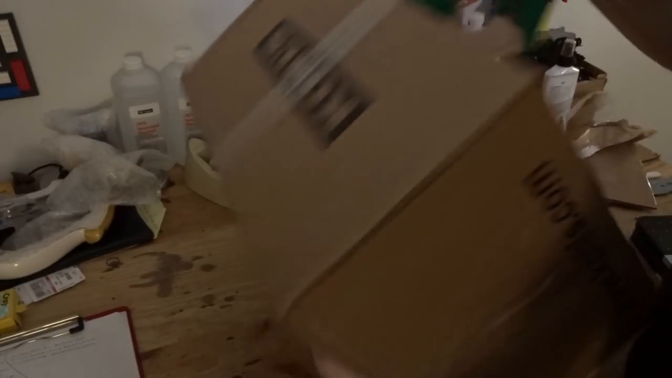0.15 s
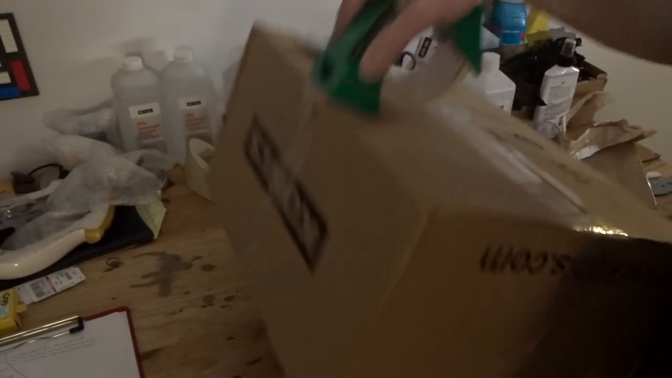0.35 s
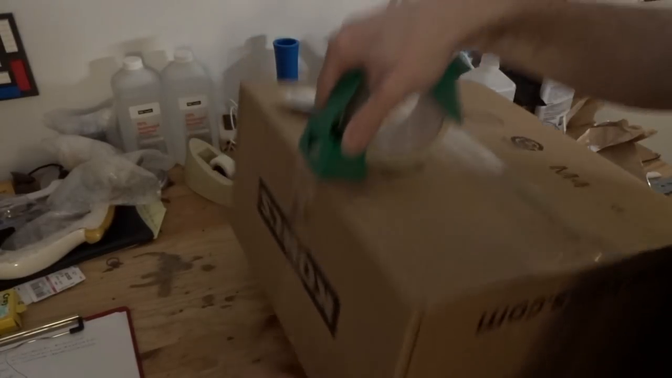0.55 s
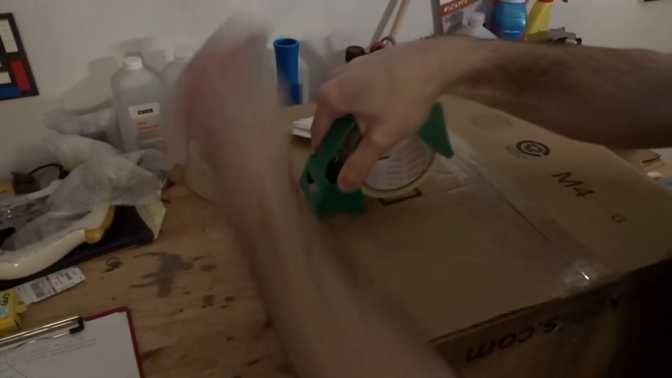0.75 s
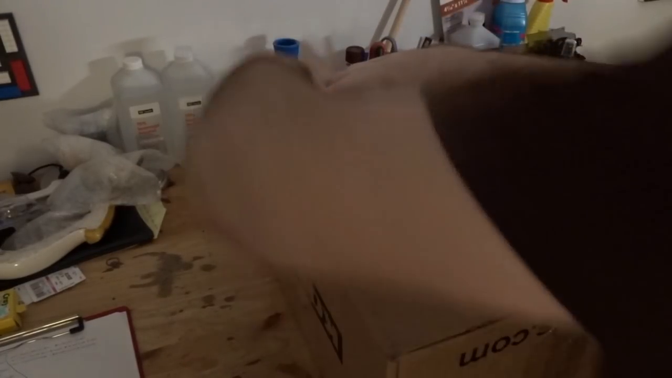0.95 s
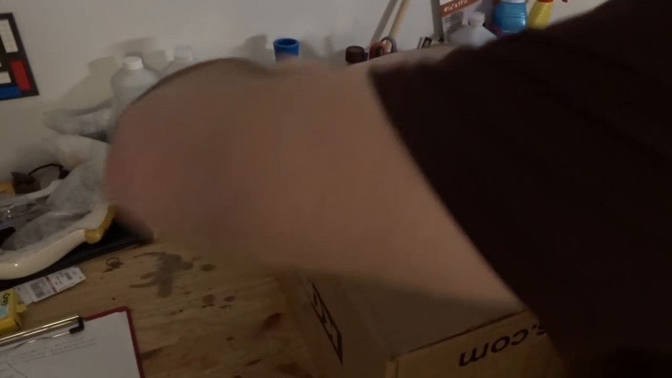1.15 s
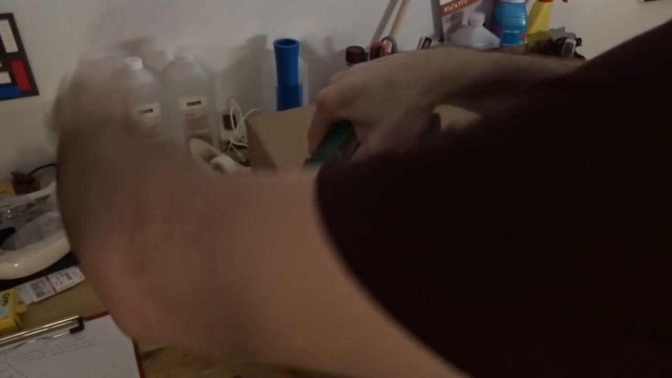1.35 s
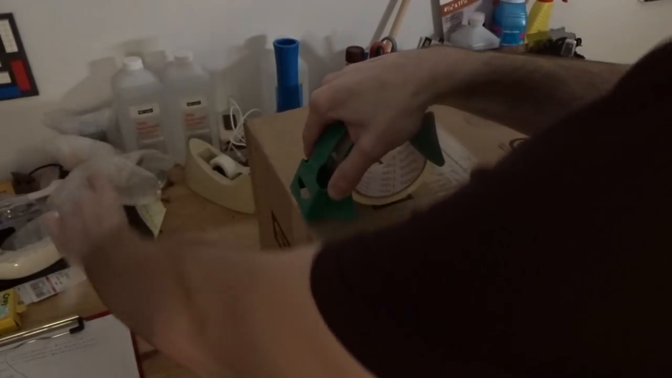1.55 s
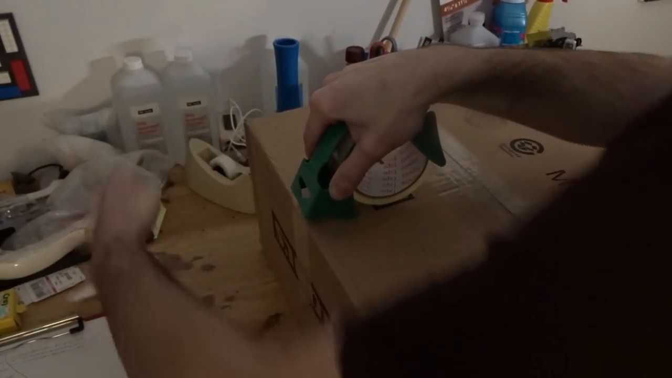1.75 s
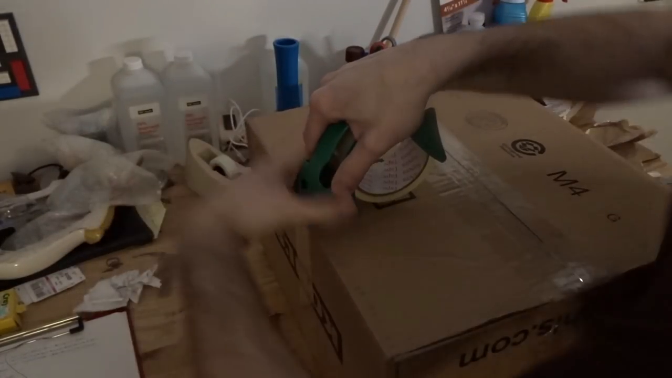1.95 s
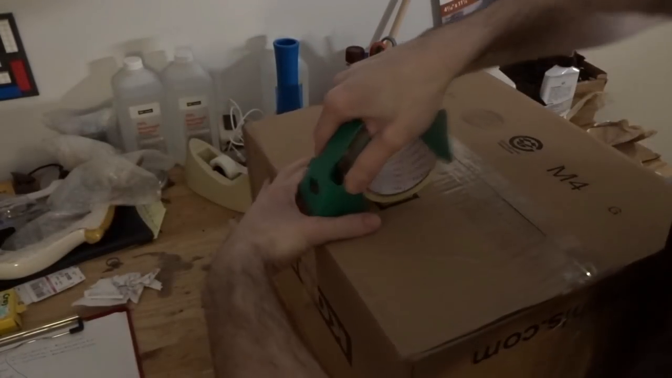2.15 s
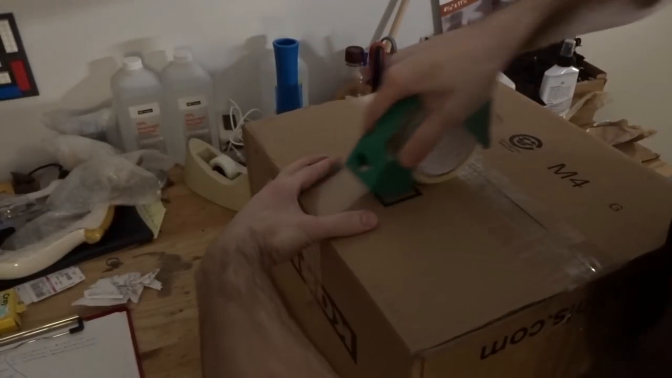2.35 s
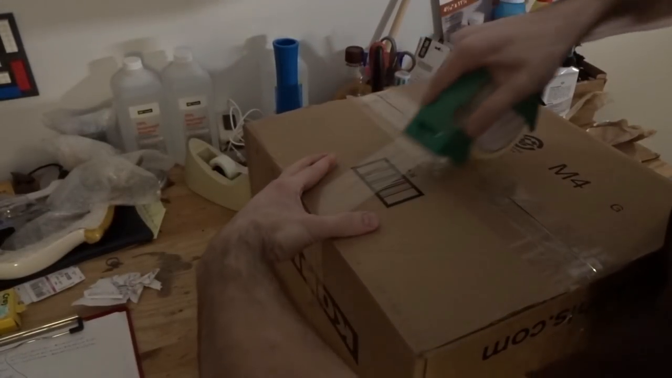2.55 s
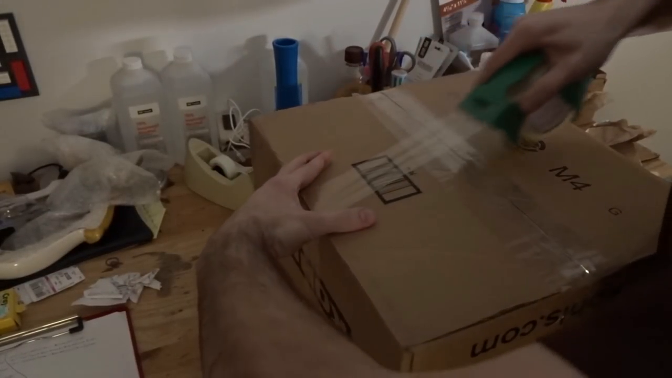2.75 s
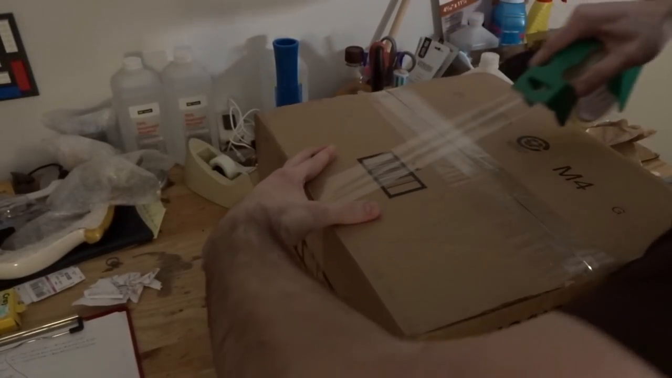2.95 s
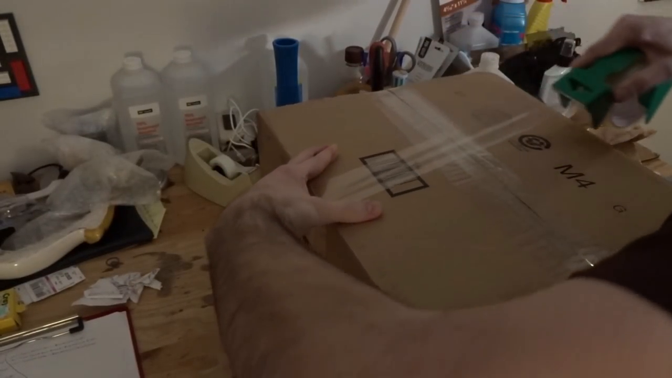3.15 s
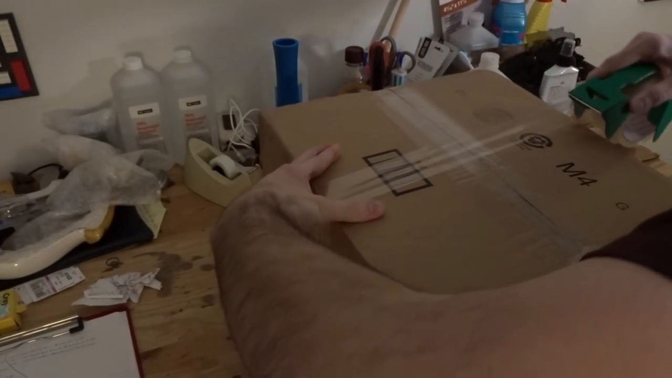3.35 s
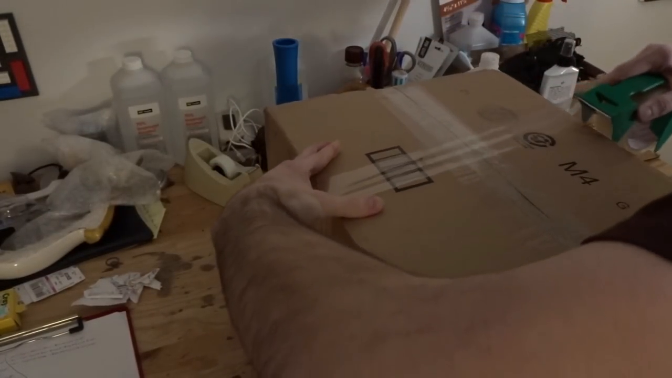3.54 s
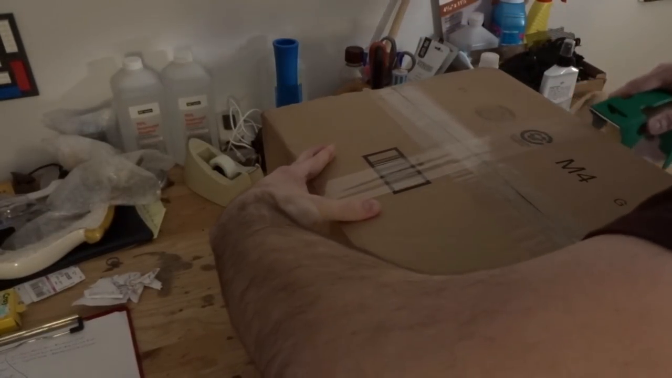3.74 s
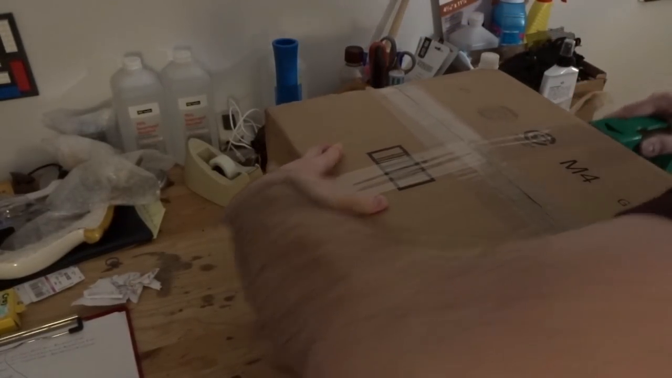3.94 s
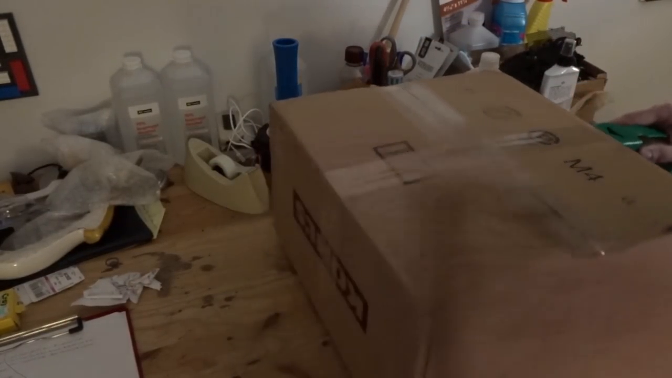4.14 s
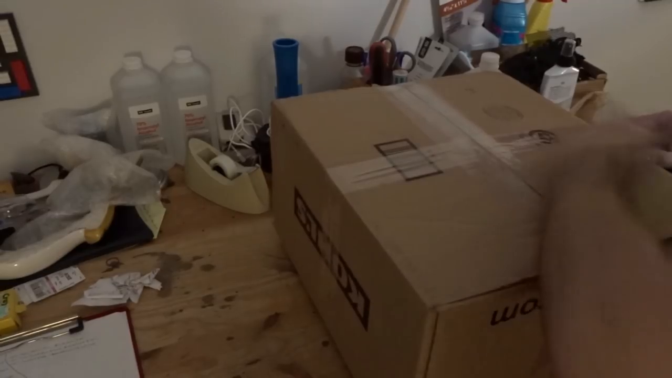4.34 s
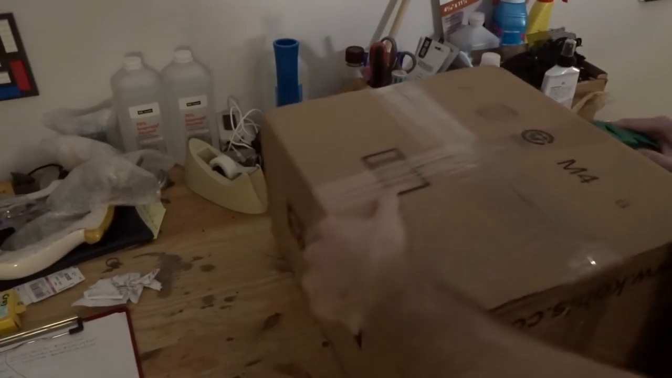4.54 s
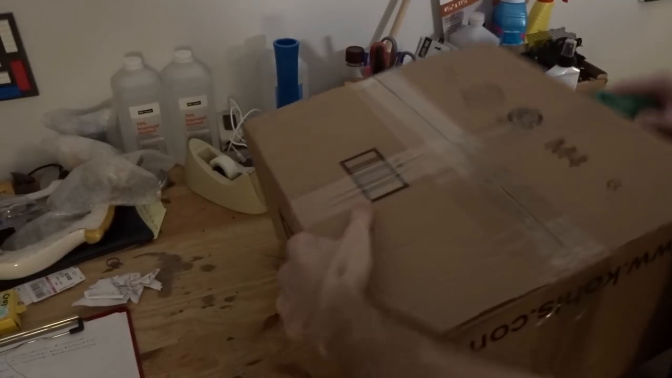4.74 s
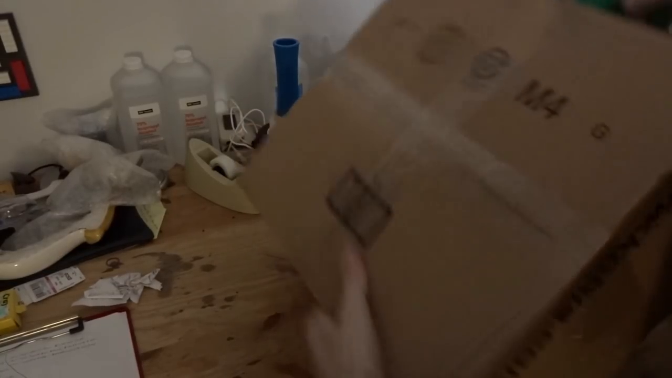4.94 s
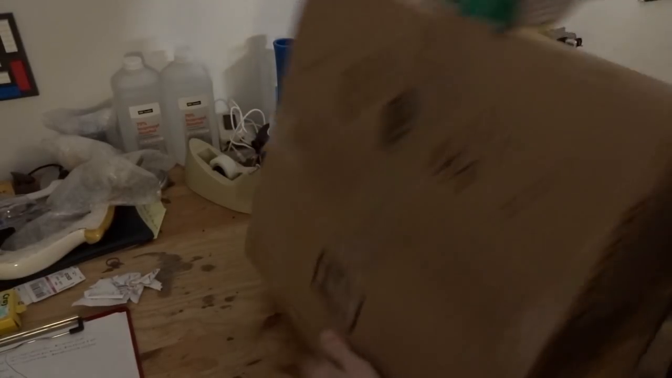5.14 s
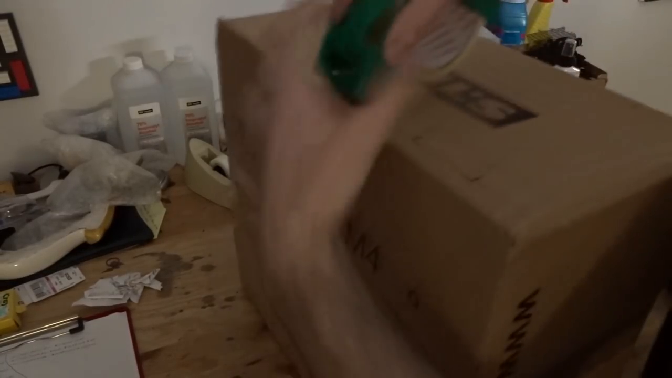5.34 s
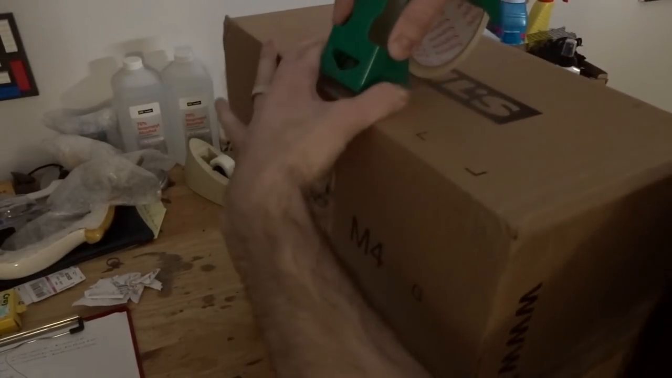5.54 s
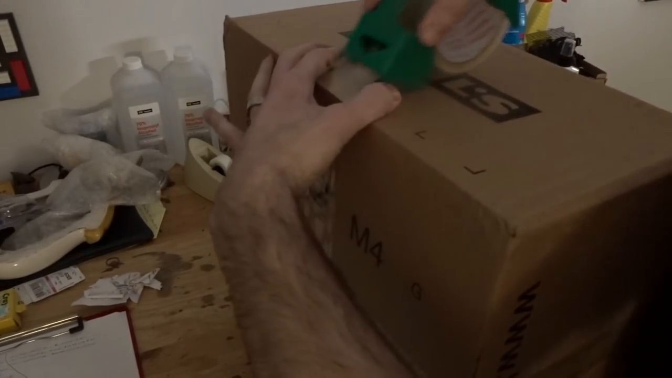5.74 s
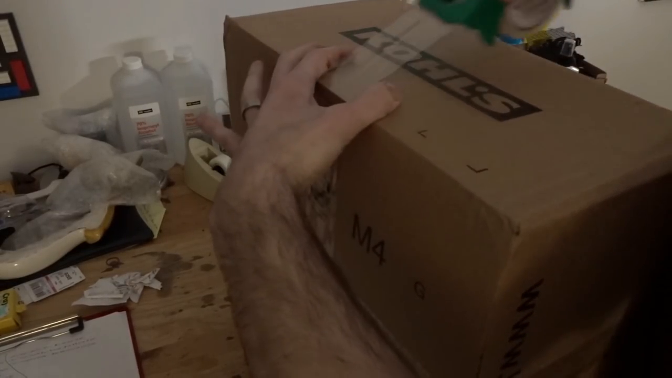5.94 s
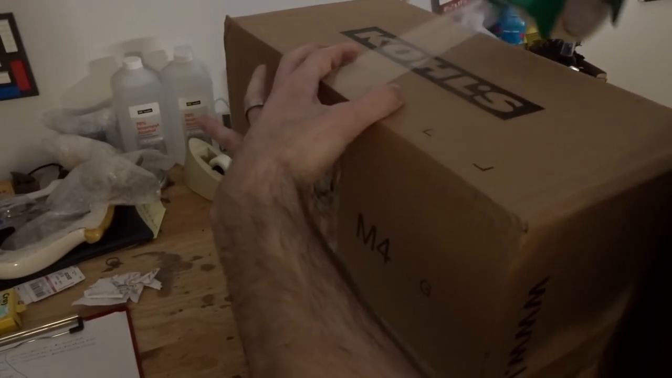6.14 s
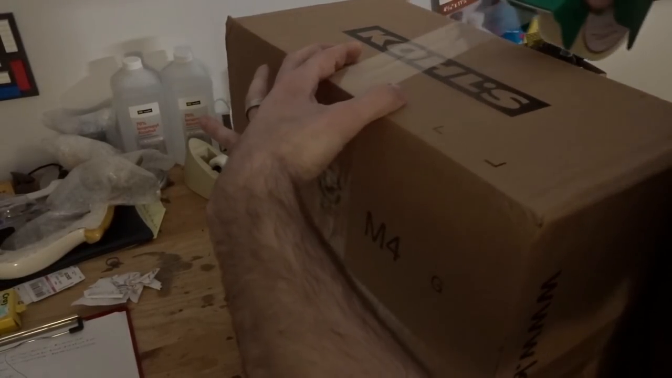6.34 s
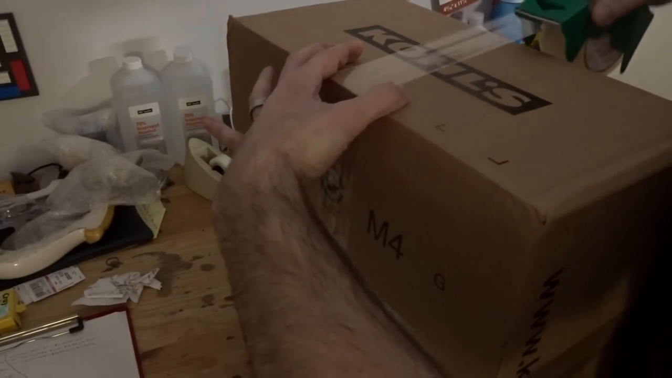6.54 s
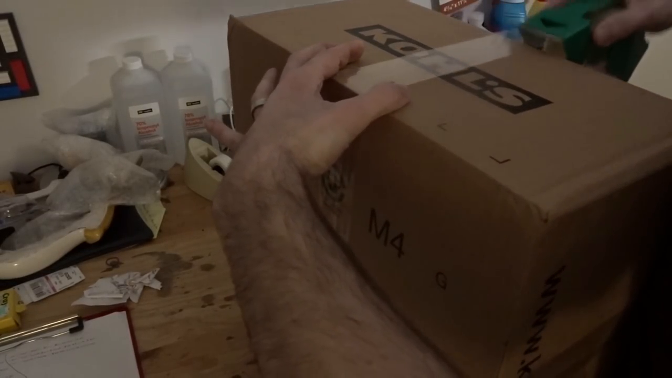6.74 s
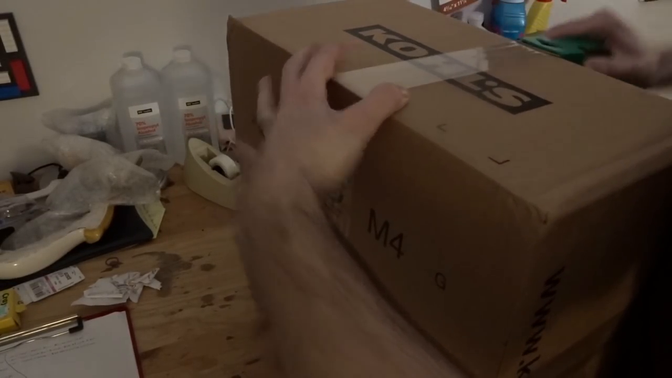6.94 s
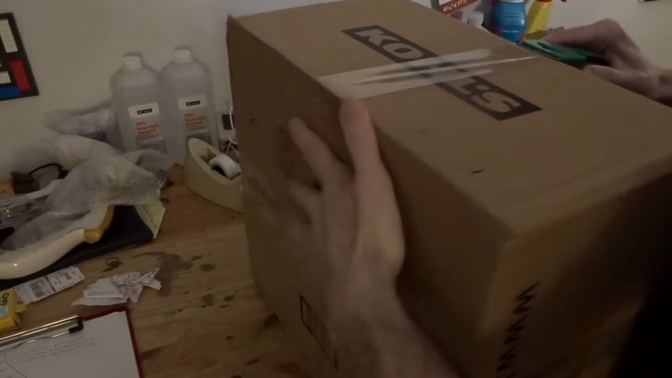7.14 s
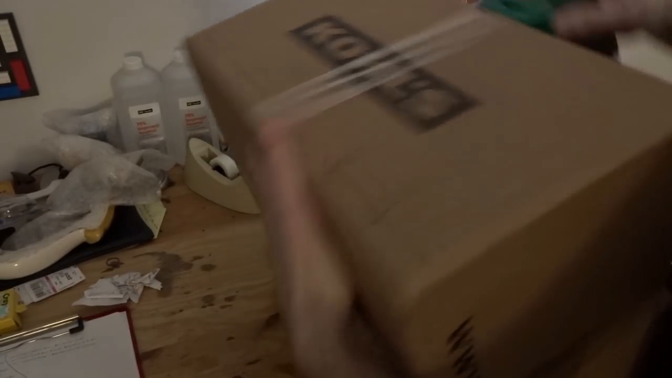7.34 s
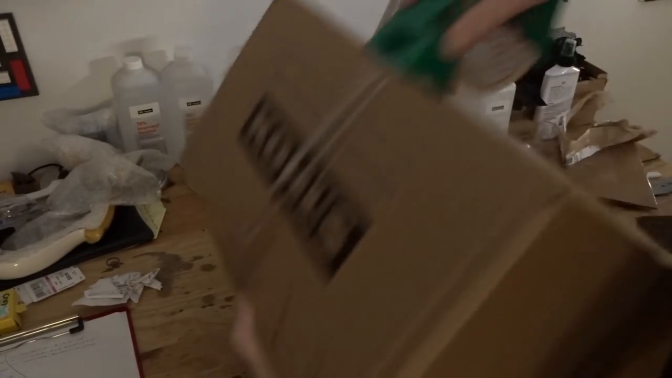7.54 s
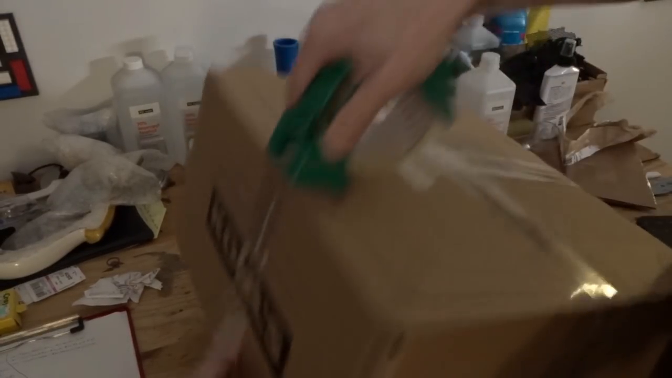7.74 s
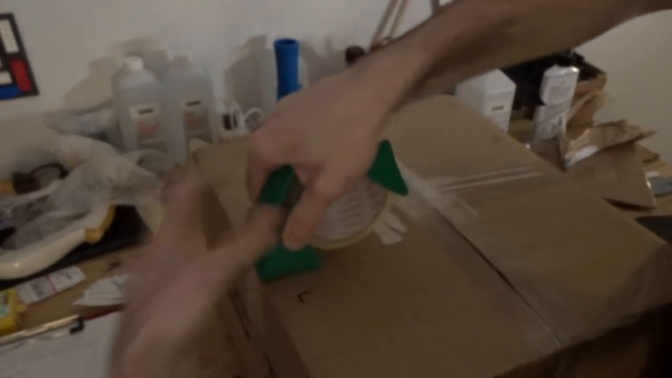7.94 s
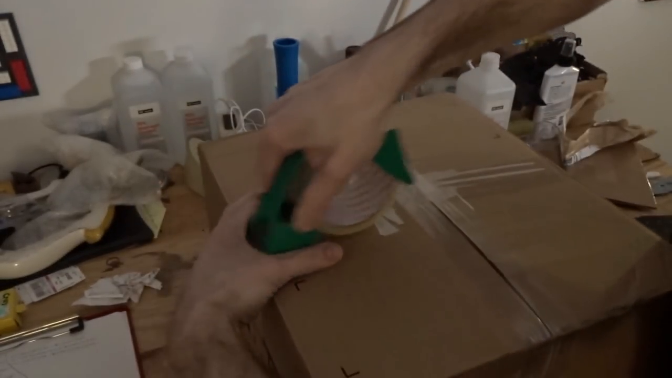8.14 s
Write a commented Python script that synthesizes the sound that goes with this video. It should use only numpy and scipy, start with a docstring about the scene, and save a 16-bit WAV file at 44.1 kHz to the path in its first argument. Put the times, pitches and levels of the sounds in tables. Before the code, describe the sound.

Close to a workbench in a small live room, a cardboard box is bumped and slid with hollow thuds and papery scrapes. Plastic ticks and film crinkles lead to a long, loud, ratcheting tape pull, then spaced sharp snaps. The box is thumped and turned over, a shorter pull follows with more snaps, then more handling and a last rip with a faint metallic ring.

```python
"""Stick-slip of packing tape over a cardboard box

Tape is pulled from a hand dispenser across a box on a workbench, in a small live room.
Stick-slip: the tape holds and lets go in chains of loud snaps, each a noise burst through resonant filters.
Between pulls the box is slid, turned and set down: friction is filtered random catches, a bump excites modes.
Plastic ticks, film crinkles and a ringing cutter join in; a wall and a diffuse echo answer.
A fast limiter makes the level dip briefly at the loudest moments."""
import sys
import numpy as np
from scipy import signal
from scipy.fft import rfft, irfft, next_fast_len
from scipy.io import wavfile
from scipy.ndimage import uniform_filter1d, minimum_filter1d, map_coordinates

SR = 44100
rng = np.random.default_rng(int(sys.argv[2]) if len(sys.argv) > 2 else 0)


def log_audio(samples):
    """Write samples as a 16-bit WAV file to the path given in sys.argv[1]."""
    # one column per channel
    frames = np.atleast_2d(samples).T
    # limit to full scale, then quantise
    limited = np.clip(frames, -1, 1)
    pcm = np.round(limited * 32767).astype(np.int16)
    wavfile.write(sys.argv[1], SR, pcm)


N = 360914  # length in samples

# Levels in the tables are relative: each source adds its own gain.
# a hand or sleeve brushes the cardboard: [loudest at t/s, rise/s, fall/s, level/dB]
BRUSHES = [(0, .1, 0.13, -50.5), (.52, 0.21, 0.11, -36.5), (1.302, .015, 0.019, -35.5),
           (1.55, 0.13, 0.13, -51), (2.02, 0.028, .05, -45.5), (4.18, 0.054, 0.052, -37.5),
           (4.31, 0.064, 0.028, -40), (4.41, 0.028, 0.023, -46.5), (4.52, 0.07, 0.045, -40),
           (5.16, .012, 0.016, -41), (5.49, 0.038, 0.024, -46.5), (7.01, 0.024, 0.043, -56),
           (7.76, 0.1, 0.024, -45.5)]
BRUSH_DROP_DB = 8.5  # lost over one rise or fall time
# box or dispenser is shoved along: [t/s, length/s, judder level/dB, scrape level/dB, hiss level/dB]
SLIDES = [(0.093, 0.53, -47, -50.5, -59), (.66, 0.11, -60, -65.5, -85), (1.007, 0.14, -44, -40.5, -40.5),
          (1.616, 0.033, -69, -44.5, -69.5), (1.95, 0.36, -69.5, -58.5, -52.5),
          (4.178, 0.13, -55.5, -56, -51.5), (4.552, 0.12, -57.5, -51.5, -54.5),
          (4.826, 0.22, -45, -46, -43.5), (5.155, 0.18, -49.5, -43.5, -46.5),
          (5.49, .1, -62.5, -61.5, -55.5), (5.664, 0.024, -58.5, -51.5, -48),
          (7.102, 0.09, -61, -65, -52.5), (7.379, 0.21, -46, -57, -51.5), (7.65, 0.45, -51, -56, -50.5)]
GRIP_SHARE, COAST_DB_PER_S = 0.56, 109  # onset as a share of the shove's length; decay after it
# the dispenser's roller shakes the lid, less as it runs to the edge
ROLLER_DB, ROLLER_FADE_DB_PER_S = -37, 42.5
# spectrum of panels juddering: [f/Hz, level/dB]
JUDDER_SPECTRUM = [(25, -39), (65, -3.5), (95, -7.5), (150, 1.5), (200, 0.5), (240, 5), (290, 1.5),
                   (370, -3), (480, -6.5), (750, -21), (1500, -45.5)]
# spectrum of the paper face scraping: [f/Hz, level/dB]
SCRAPE_SPECTRUM = [(300, -3.5), (600, 8.5), (1200, 4.5), (3000, 1.5), (6000, -11), (12000, -37)]
# spectrum of the paper face hissing: [f/Hz, level/dB]
HISS_SPECTRUM = [(800, -37), (2200, -15), (4000, -2.5), (7000, -1.5), (11000, -2.5), (16000, -13.5)]
# spectrum of the still room: [f/Hz, level/dB]
AIR_SPECTRUM = [(25, 4.5), (60, 8), (150, -2.5), (400, 0), (1500, 1), (5000, -16), (16000, -17.5)]
# width of diffuse sound: [f/Hz, side over mid level/dB]
WIDTH = [(100, -34), (500, -15.5), (1200, -11.5), (3500, -12), (8000, -12.5), (14000, -18)]
# box and bench are bumped: [t/s, level/dB, favoured f/Hz, slap level/dB]
KNOCKS = [(0.088, -37.5, 140, -37), (0.35, -35, 234, -15), (0.425, -32, 315, -5), (0.636, -26.5, 307, 3),
          (0.977, -28.5, 116, -2.5), (1.022, -26, 318, 0), (1.103, -24.5, 387, 7.5), (1.642, -32.5, 388, 7),
          (1.731, -37, 437, 6), (1.911, -43, 124, -6), (1.991, -29.5, 320, 0.5), (2.052, -47, 150, 0.5),
          (4.176, -31, 377, -10), (4.49, -37, 118, -9), (4.567, -14.5, 250, -0.5), (5.386, -36, 178, -1.5),
          (5.468, -33.5, 237, -28), (6.992, -49.5, 272, 0.5), (7.121, -31, 150, -1.5),
          (7.229, -40, 377, -5), (7.508, -38.5, 172, 0), (7.596, -41, 231, 1), (7.931, -34, 218, 11),
          (8.072, -29.5, 369, 0)]
# modes of the box on the bench: [f/Hz, level/dB, t60/s]
BOX_MODES = [(112.7, -6.5, 0.16), (148.3, -6, 0.12), (203, -12, 0.097), (238, -4, 0.12), (296, -2.5, .06),
             (368, 0.5, 0.047), (433, -7, 0.12), (581, -19.5, 0.3), (635, -22, 0.074), (815, -13, 0.084)]
# spectrum of a slap on cardboard: [f/Hz, level/dB]
SLAP_SPECTRUM = [(150, -16), (600, 3), (1300, 0.5), (2500, -6), (5000, -10.5), (10000, -10), (16000, -19)]
# reverberation time of the room: [f/Hz, t60/s]
ROOM_DECAY = [(100, 0.36), (300, 0.62), (1000, 0.61), (3500, 0.61), (6400, 0.48), (9000, 0.39),
              (13000, 0.25), (16000, 0.13)]
# ticks of the dispenser and of crinkling tape: [t/s, level/dB, resonance f/Hz]
TICKS = [(1.015, -19, 7200), (1.0563, -14, 4540), (1.5684, -19.5, 2290), (1.6152, -42, 1500),
         (1.8834, -32.5, 2360), (4.954, -18, 4400), (5.1566, -19, 5550), (6.763, -29, 9000)]
# single jerks of tape off the roll:
# [t/s, level/dB, tape runs on for/s, film ring f/Hz, stretched-tape drum f/Hz, body level/dB]
SNAPS = [(1.099, -31, 0.0019, 3970, 1520, -4.5), (1.117, -33, 0, 8900, 1400, -8.5),
         (1.13, -34, 0.0069, 4420, 1250, 2), (2.127, -32, 0.00061, 6660, 1720, 0),
         (2.196, -14, 0.0016, 1670, 1740, -6), (3.031, -22.5, 0.0099, 1610, 1500, 3.5),
         (3.085, -17.5, 0, 4460, 1520, -9), (3.149, -17.5, 0, 4360, 1390, -3.5),
         (3.192, -27, 0, 3360, 1526, 7), (3.235, -27, 0.048, 1670, 1530, 7),
         (3.496, -29, 0, 4230, 1290, -3), (3.588, -18.5, 0, 4300, 1340, -5),
         (3.621, -24, 0, 3380, 1330, -3), (3.653, -24, .04, 1420, 1160, 1),
         (5.186, -31, 0.0037, 760, 860, 2.5), (5.228, -31.5, 0.0024, 5970, 855, 4),
         (5.691, -32, 0.0018, 3630, 797.5, 0), (5.721, -28, 0.002, 3170, 930, -2),
         (6.124, -19, 0.011, 3270, 1360, -4.5), (6.157, -23, 0, 3430, 1404, -1.5),
         (6.226, -36.5, 0, 4890, 1440, 0), (6.277, -19.5, 0.00063, 1540, 1620, 0.5),
         (6.344, -25, 0, 6300, 1450, -3.5), (6.373, -29.5, 0.0038, 3730, 1443, -4),
         (6.404, -19.5, 0.0031, 4400, 1470, -0.5), (6.564, -24, 0, 3340, 1620, -4),
         (7.907, -22, 0.047, 4830, 1130, -4.5)]
# long pulls, each a curve of the hand's effort: [t/s, slip rate/Hz, level/dB, body level/dB]
PULLS = [
    [(2.217, 44, -22.5, -1.5), (2.4, 37.9, -20, 3), (2.55, 34.2, -22, -1.5), (2.8, 42.3, -26, -1.5),
     (3.01, 39.8, -31, 4.5)],
    [(5.76, 46.2, -23.5, -5), (5.86, 53, -25, -2), (5.98, 39.8, -24.5, 2.5), (6.11, 38, -35, -7)],
]
# spectrum of a snap, and of a tick: [f/Hz, level/dB]
FILM_SPECTRUM = [(40, -27), (150, -25), (330, -20.5), (550, -13), (900, -4), (1550, -3.5), (2250, -5.5),
                 (3000, -2), (4200, 0), (7000, 0), (11000, -1.5), (16000, -9)]
# resonances of the dispenser, shaken by every snap: [f/Hz, half width/octaves, level/dB]
DISPENSER = [(2880, 0.14, 4), (3180, 0.011, 2), (5570, 0.044, 1.5)]
# both ring higher as a pull goes on: mean at its start in Hz, rise in octaves a second
RING_HZ, RING_RISE = 2980, 0.4  # film
DRUM_HZ, DRUM_RISE = 1170, 0.42  # tightening stretch of tape
SLIP_SCATTER, SLIP_SCATTER_DB = 0.13, 1  # from slip to slip: share of a gap, dB
RING_SCATTER, DRUM_SCATTER = 0.25, 0.22  # from slip to slip: octaves
# a light snap breaks clean and sizzles: table level of no added sizzle, dB of sizzle lost per dB above it
CLEAN_DB, DULLING = -32.5, 0.59
PULL_SIZZLE_DB = 2.5  # fast tape sizzles more than a single jerk
TEAR_T60_S = 0.017  # the tear dies away once the tape stops
# the tape crinkles as it is handled: [t/s, length/s, level/dB]
CRINKLES = [(1.262, 0.017, -39), (1.604, .008, -38), (1.641, 0.044, -43), (1.866, 0.055, -53)]
# spectrum of crinkling film: [f/Hz, level/dB]
CRINKLE_SPECTRUM = [(250, -29), (600, -15.5), (1310, -0.5), (1650, -4.5), (2400, 2), (3200, -9.5),
                    (4500, -4), (15000, -31.5)]
# the tape jerks against the steel cutter: [t/s, level/dB, favoured f/Hz]
JERKS = [(3.498, -56, 2920), (5.186, -48, 3300), (6.564, -36.5, 3300), (7.908, -31.5, 3700)]
# modes of the cutter: [f/Hz, level/dB, t60/s]
BLADE_MODES = [(2030, 2, 0.5), (2840, 4, .45), (3100, -20, 0.45), (3180, 4, 0.43), (3800, -5, 0.32),
               (4700, 2, 0.62), (5030, -9.5, 0.42)]
TOP_HZ = 15950  # upper band limit


def amp(db):
    """Decibel law: amplitude gain of a level in dB."""
    return 10 ** (np.asarray(db) / 20)


def unit(x):
    """Power normalisation: x at rms 1."""
    return x / np.sqrt(np.mean(x ** 2) + 1e-20)


def along(points, hz):
    """Logarithmic pitch scale: (f/Hz, value) points interpolated on a log axis."""
    f, value = np.transpose(points)
    return np.interp(np.log(hz + 1), np.log(f + 1), value)


def hump(hz, centre, octaves):
    """Resonance curve: a bump of height 1 with the given half width."""
    return 1 / (1 + (np.log2((hz + 1) / centre) / octaves) ** 2)


def coloured(x, gain_db):
    """Minimum phase: folding the cepstrum makes a causal filter from a gain in dB over frequency."""
    m = 2 * next_fast_len(x.shape[-1] // 2 + 2048)
    cepstrum = irfft(np.log(amp(gain_db(np.fft.rfftfreq(m, 1 / SR)))), m)
    cepstrum[1:m // 2] *= 2
    cepstrum[m // 2 + 1:] = 0
    response = np.exp(rfft(cepstrum))
    return irfft(rfft(x, m) * response, m)[..., :x.shape[-1]]


def wobble(rate):
    """Slow random variation: a smooth curve through random knots, rate of them a second."""
    knots = rng.standard_normal(int(N * rate / SR) + 4)
    return map_coordinates(knots, [np.arange(N) * rate / SR])


def burst(t, t60):
    """Exponential decay: noise that falls 60 dB in t60 seconds."""
    return rng.standard_normal(len(t)) * amp(-60 * t / t60)


def add(track, s, x):
    """Superposition: mix x into the track at s seconds."""
    part = track[..., max(round(s * SR), 0):][..., :x.shape[-1]]
    part += x[..., :part.shape[-1]]


def spread(pair):
    """Decorrelation: mid plus and minus an unrelated side signal gives a diffuse left and right."""
    side = coloured(pair[1], lambda hz: along(WIDTH, hz))
    return np.array([pair[0] + side, pair[0] - side])


def shove(s, length):
    """Onset and damping: gain of a push that takes hold, lasts and coasts to rest."""
    t = np.arange(N) / SR - s
    hold = np.clip(t / (GRIP_SHARE * length) + 0.5, 0, 1)
    return hold * amp(-COAST_DB_PER_S * np.maximum(t - length, 0))


def friction(spectrum, catches, smooth):
    """Dry friction: tiny catches of uneven size, so many a second, over a smooth rush."""
    grains = (rng.random((2, N)) < catches / SR) * rng.standard_normal((2, N))
    rubbing = unit(grains) + smooth * rng.standard_normal((2, N))
    return unit(spread(coloured(rubbing, lambda hz: along(spectrum, hz))))


def slides(judder_db=0, scrape_db=0, hiss_db=0):
    """Sliding friction: box panels judder, the paper face scrapes and hisses; roller and hands join in."""
    t = np.arange(N) / SR
    pushes = [shove(s, length) for s, length, *_ in SLIDES]
    judder, scrape, hiss = amp([row[2:] for row in SLIDES]).T @ pushes
    for pull in PULLS:
        start, end = pull[0][0], pull[-1][0]
        roller = amp(ROLLER_DB - ROLLER_FADE_DB_PER_S * abs(t - start))
        judder = judder + shove(start, end - start) * roller
    for s, rise, fall, db in BRUSHES:
        away = np.maximum((s - t) / rise, (t - s) / fall)
        hiss = np.hypot(hiss, amp(db - BRUSH_DROP_DB * away))  # powers add
    grip = wobble(28)  # one uneven grip varies all three, in dB
    judder = judder * amp(judder_db + 1.8 * grip)
    scrape = scrape * amp(scrape_db + 1.9 * grip)
    hiss = hiss * amp(hiss_db + 0.5 * grip)
    return (judder * friction(JUDDER_SPECTRUM, catches=120, smooth=1.0)
            + scrape * friction(SCRAPE_SPECTRUM, catches=1200, smooth=4.3)
            + hiss * friction(HISS_SPECTRUM, catches=4300, smooth=1.1))


def knocks(thud_db=2, slap_db=0, spot_db=9):
    """Modal excitation: a bump slaps the cardboard and rings the box; the spot hit favours some modes."""
    out, t = np.zeros(N), np.arange(SR // 4) / SR
    hz, level, t60 = np.transpose(BOX_MODES)[:, :, None]
    for s, db, spot_hz, hard_db in KNOCKS:
        strength = level + spot_db * hump(hz, spot_hz, 0.36) + rng.normal(0, 2.1, hz.shape)
        mode_hz = hz * (1 + rng.normal(0, 0.025, hz.shape))
        swing = np.sin(2 * np.pi * mode_hz * t) * rng.choice([-1, 1], hz.shape)
        thud = np.sum(amp(strength - 60 * t / t60) * swing, 0)
        thud = thud * (1 - np.exp(-t / 0.00042))  # soft contact
        thud = coloured(thud, lambda f: -12 / (1 + (f / 85) ** 4))  # small panels radiate little deep bass
        slap = coloured(burst(t, 0.059), lambda f: along(SLAP_SPECTRUM, f))
        thud = amp(thud_db) * thud / abs(thud).max()
        slap = amp(hard_db + slap_db) * slap / abs(slap).max()
        add(out, s, amp(db) * (thud + slap))
    return out


def room(x, build=0.0085):
    """Reverberation: noise tails swell and die by band, renewed every quarter second as hands and box move."""
    out, hop = np.zeros((2, N)), SR // 4
    for start in range(-hop, N, hop):
        part = x[max(start, 0):start + 2 * hop]
        window = np.hanning(2 * hop)[max(-start, 0):]
        part = part * window[:len(part)]
        hz, t, bands = signal.stft(rng.standard_normal((2, 3 * hop)), SR, nperseg=256)
        decay = amp(-60 * t / along(ROOM_DECAY, hz)[:, None])
        tail = signal.istft(bands * decay, SR, nperseg=256)[1]
        tail *= 1 - np.exp(-np.arange(tail.shape[1]) / SR / build)
        tail = tail / np.linalg.norm(tail[0])
        add(out, max(start, 0) / SR, signal.fftconvolve(part[None], tail, axes=1))
    return spread(out)


def ticks(tick_db=-1):
    """Impulsive excitation: short dry clicks of plastic, each with one broad resonance."""
    out, t = np.zeros(N), np.arange(SR // 10) / SR
    for s, db, tick_hz in TICKS:
        click = coloured(burst(t, 0.02), lambda hz: along(FILM_SPECTRUM, hz) + 8 * hump(hz, tick_hz, 0.28))
        add(out, s, amp(db + tick_db) * click / abs(click).max())
    return out


def snap(db, run_s, ring_hz, drum_hz, body_db, bright_db=0,
         snap_db=3, ring_db=7, drum_db=6, tear_db=-10, crackle_db=6):
    """Sudden release: the glue line cracks, then tears; film, dispenser and stretched tape resonate."""
    t = np.arange(SR // 8) / SR
    bunches = np.repeat(rng.standard_normal(len(t)), 22)[:len(t)]  # glue threads part in half-ms bunches
    threads = unit(amp(crackle_db * bunches))
    crack = burst(t, 0.0046) * (1 - np.exp(-t / 0.00052))
    tear = amp(tear_db) * threads * burst(np.maximum(t - run_s, 0), TEAR_T60_S)

    def resonance(hz):
        housing = sum(gain * hump(hz, centre, width) for centre, width, gain in DISPENSER)
        film = ring_db * hump(hz, ring_hz, 0.076)
        skin = drum_db * hump(hz, drum_hz, 0.15)
        return along(FILM_SPECTRUM, hz) + housing + film + skin

    sizzle_db = bright_db + DULLING * (CLEAN_DB - db)

    def tone(hz):
        body = body_db / (1 + (hz / 2100) ** 4)  # low shelf
        sizzle = sizzle_db * (1 - 1 / (1 + (hz / 6400) ** 4))  # high shelf
        return body + sizzle

    slip = unit(coloured(crack + tear, resonance))
    return amp(db + snap_db) * coloured(slip, tone)


def tape(single_db=-1, pull_db=-1):
    """Stick-slip: single jerks, and long pulls that stick and slip at an uneven rate."""
    out = np.zeros(N)
    for s, *jerk in SNAPS:
        add(out, s, amp(single_db) * snap(*jerk))
    for pull in PULLS:
        when, rate, level, body = np.transpose(pull)
        t = np.arange(when[0], when[-1], 1 / SR)
        slips = np.cumsum(np.interp(t, when, rate)) / SR  # running count
        scatter = rng.standard_normal((int(slips[-1]) + 1, 4))
        for k, (late, loud, high, taut) in enumerate(scatter):
            s = np.interp(k + SLIP_SCATTER * late, slips, t)
            ring_hz = RING_HZ * 2 ** (RING_RISE * (s - t[0]) + RING_SCATTER * high)
            drum_hz = DRUM_HZ * 2 ** (DRUM_RISE * (s - t[0]) + DRUM_SCATTER * taut)
            db = np.interp(s, when, level) + SLIP_SCATTER_DB * loud
            body_db = np.interp(s, when, body)
            add(out, s, amp(pull_db) * snap(db, 0, ring_hz, drum_hz, body_db, PULL_SIZZLE_DB))
    return out


def crinkles(release_db_per_s=500):
    """Buckling: sparse little catches of the film under a brief press."""
    t = np.arange(N) / SR
    press = sum((t > s) * amp(db - release_db_per_s * np.maximum(t - s - length, 0))
                for s, length, db in CRINKLES)
    return press * friction(CRINKLE_SPECTRUM, catches=800, smooth=0.12)[0]


def cutter(blade_db=-4, waver=1.58, spot_db=6):
    """Free vibration: blade modes ring on after a jerk; the hand that holds it makes the ring waver."""
    out, t = np.zeros(N), np.arange(SR) / SR
    for s, db, spot_hz in JERKS:
        for hz, level, t60 in BLADE_MODES:
            level = level + spot_db * hump(hz, spot_hz, 0.1)
            # random walk of phase, waver radians rms after 10 ms
            drift = waver * np.cumsum(rng.standard_normal(SR)) / np.sqrt(SR / 100)
            envelope = amp(db + blade_db + level + rng.normal(0, 2.7) - 60 * t / t60)
            add(out, s, envelope * np.sin(2 * np.pi * hz * t + drift))
    return out


def scene(echo_db=-3, wall_db=-6, box_echo_db=-4, air_db=-68):
    """Direct and reflected sound: the sources, the wall behind the bench, the room's echo and its still air."""
    film = tape() + ticks() + crinkles() + cutter()
    box = knocks()
    wall = np.zeros(N)
    add(wall, 0.0059, amp(wall_db) * film)
    echo = room(film + amp(box_echo_db) * box)  # the box is closest, so it sounds drier
    air = unit(spread(coloured(rng.standard_normal((2, N)), lambda hz: along(AIR_SPECTRUM, hz))))
    return film + box + wall + amp(echo_db) * echo + slides() + amp(air_db) * air


def record(dry, ceiling_db=-13.0, release_db=1900):
    """Limiting: gain follows power, looks 2 ms ahead, recovers at release_db a second; then the band limit."""
    power = abs(uniform_filter1d(np.mean(dry ** 2, 0), size=36))
    over = np.maximum(10 * np.log10(power + 1e-12) - ceiling_db, 0)
    ahead = -minimum_filter1d(-over, size=91, origin=-45)
    ramp = release_db * np.arange(N) / SR
    held = np.maximum.accumulate(ahead + ramp) - ramp
    duck = uniform_filter1d(held, size=30)
    m = next_fast_len(N + SR // 2)
    passed = np.fft.rfftfreq(m, 1 / SR) < TOP_HZ
    return irfft(rfft(dry * amp(-duck), m) * passed, m)[:, :N]


dry = scene()
out = record(dry)
log_audio(out)
```